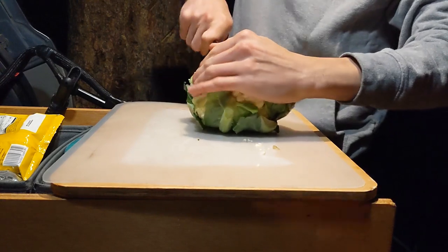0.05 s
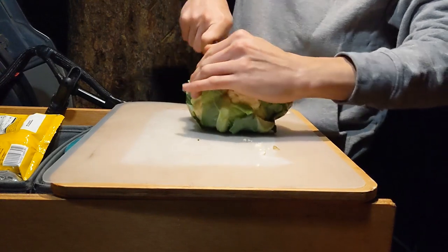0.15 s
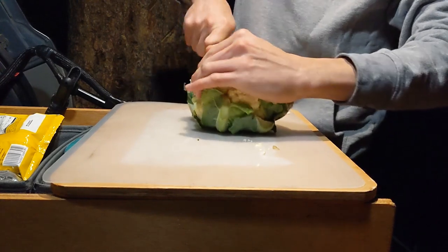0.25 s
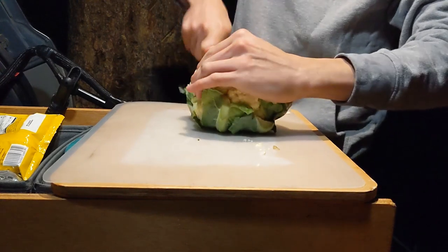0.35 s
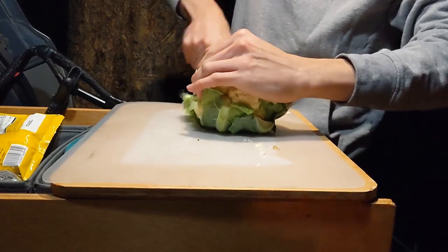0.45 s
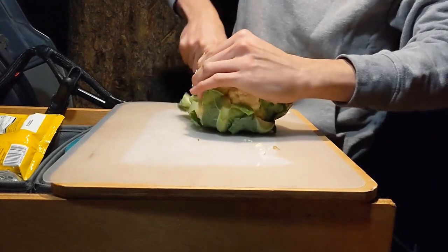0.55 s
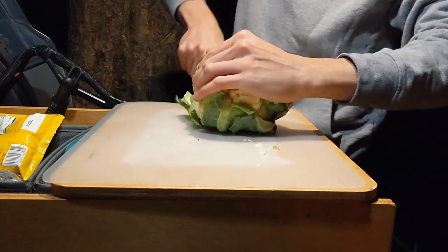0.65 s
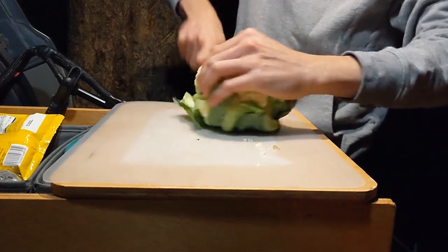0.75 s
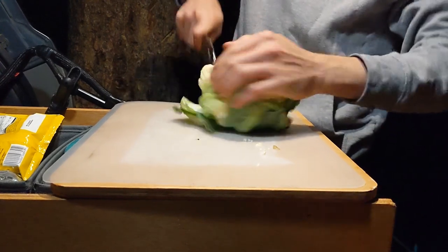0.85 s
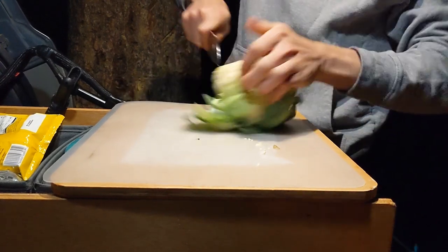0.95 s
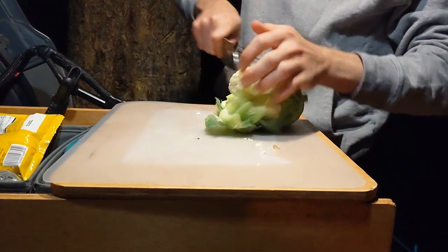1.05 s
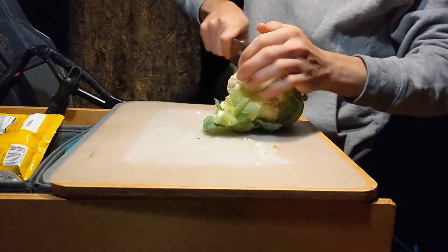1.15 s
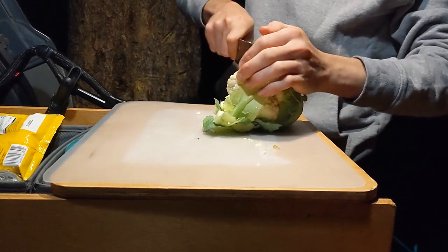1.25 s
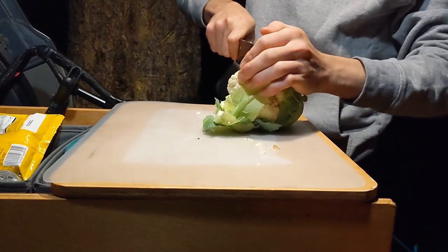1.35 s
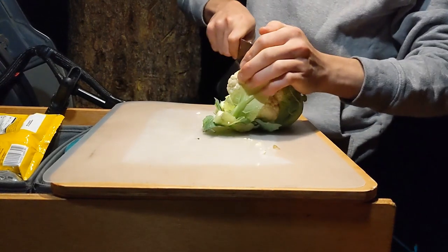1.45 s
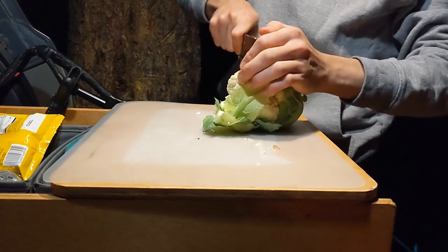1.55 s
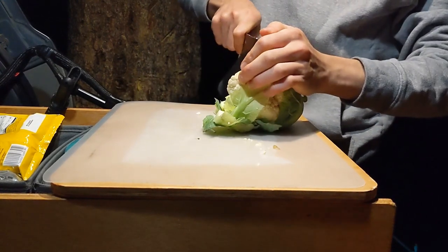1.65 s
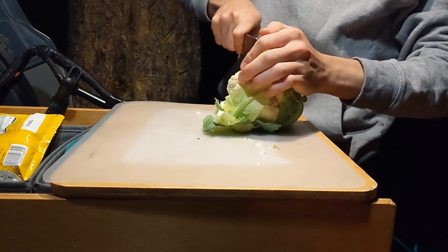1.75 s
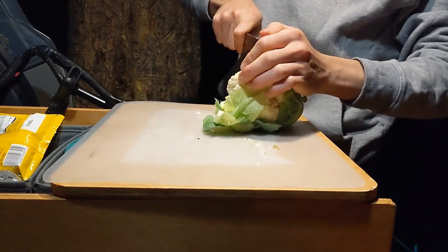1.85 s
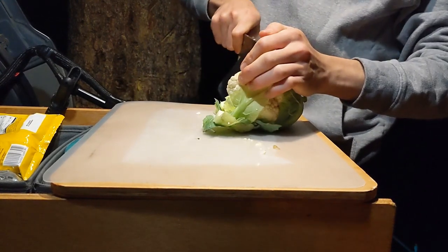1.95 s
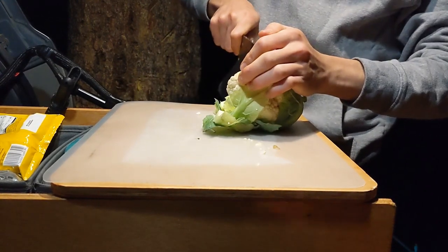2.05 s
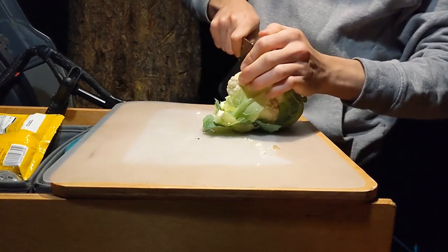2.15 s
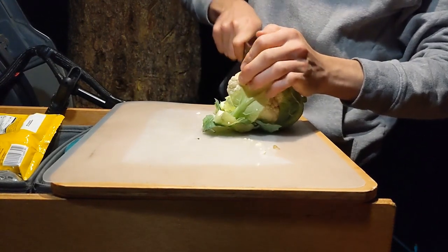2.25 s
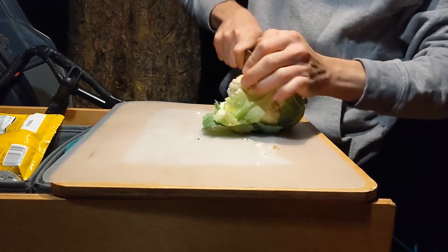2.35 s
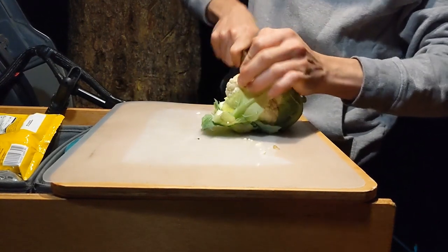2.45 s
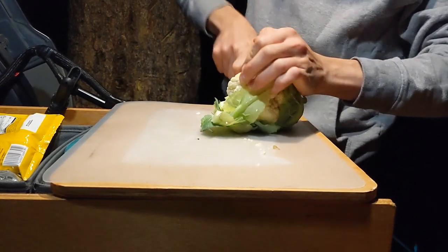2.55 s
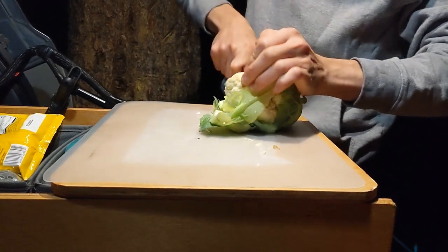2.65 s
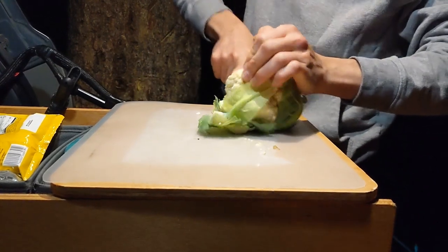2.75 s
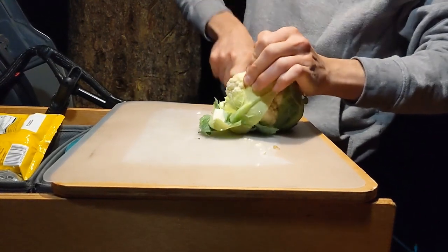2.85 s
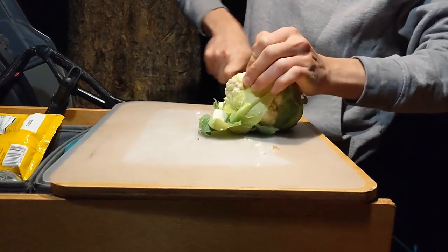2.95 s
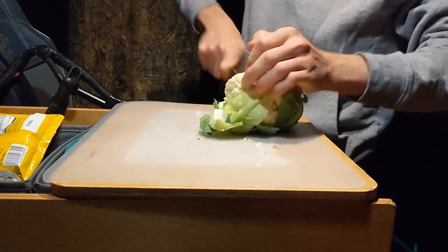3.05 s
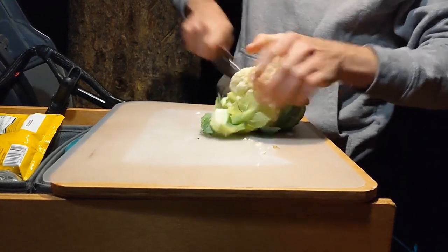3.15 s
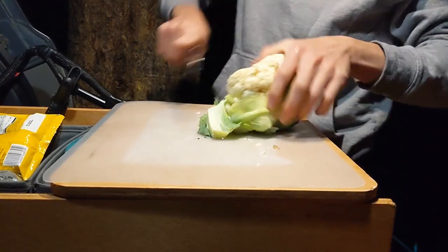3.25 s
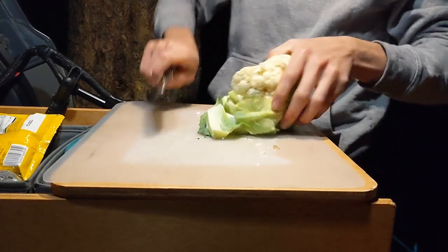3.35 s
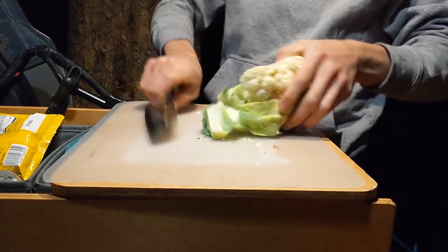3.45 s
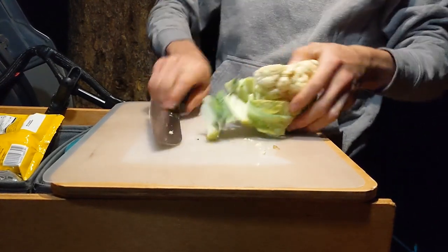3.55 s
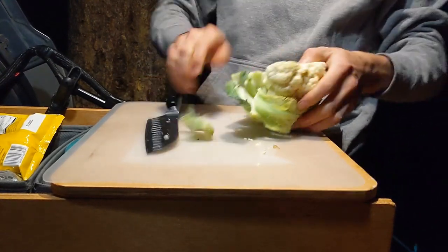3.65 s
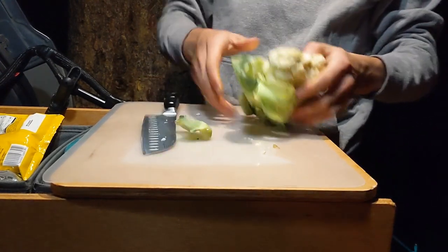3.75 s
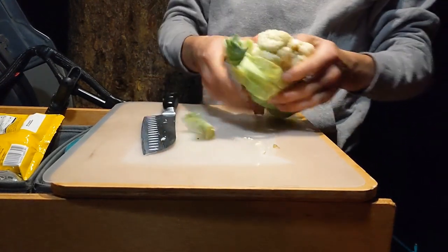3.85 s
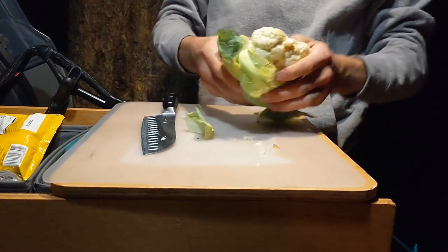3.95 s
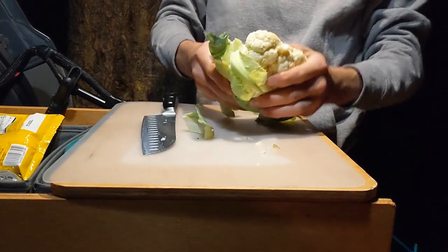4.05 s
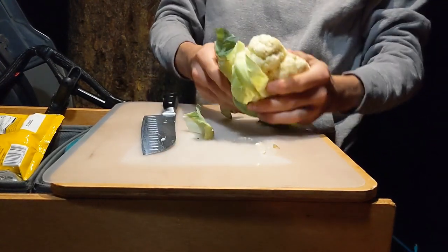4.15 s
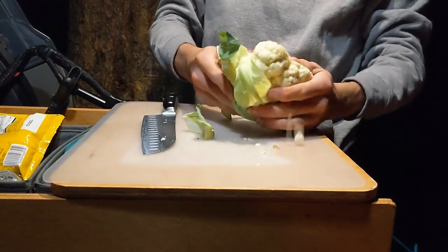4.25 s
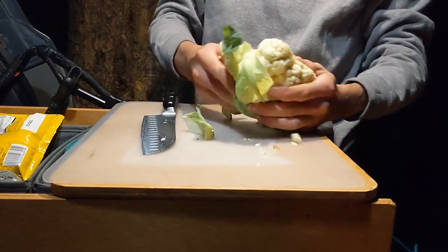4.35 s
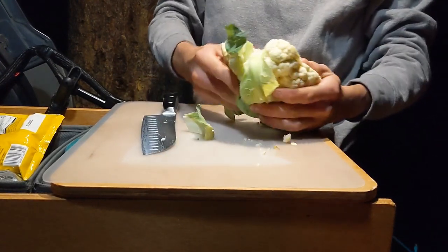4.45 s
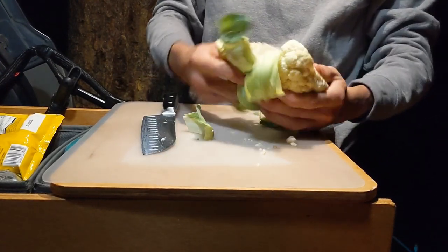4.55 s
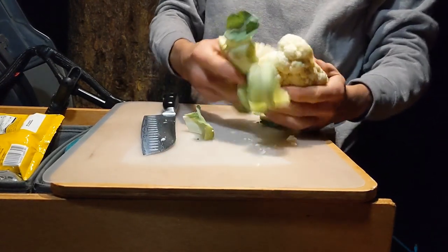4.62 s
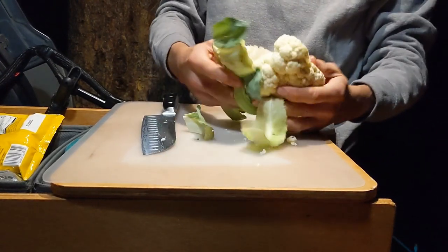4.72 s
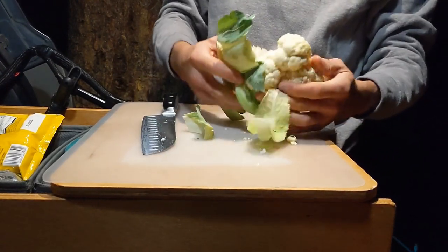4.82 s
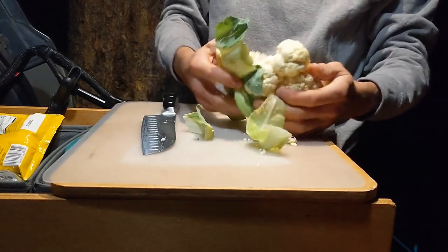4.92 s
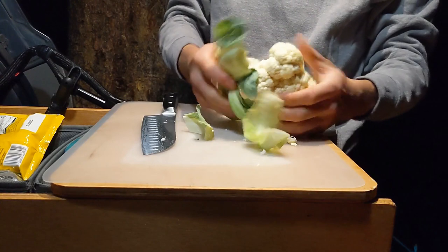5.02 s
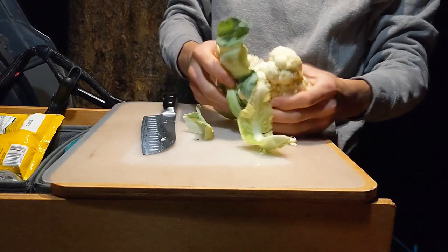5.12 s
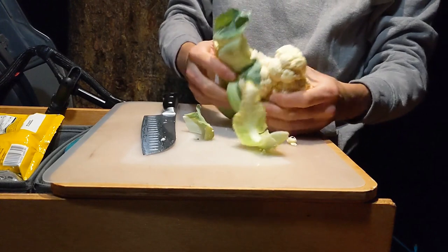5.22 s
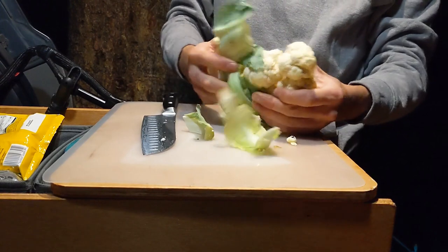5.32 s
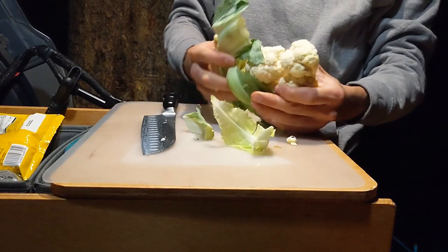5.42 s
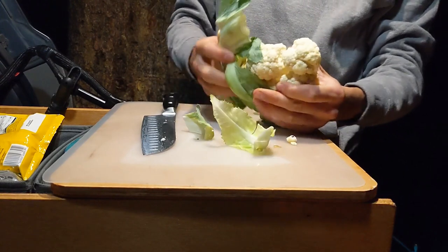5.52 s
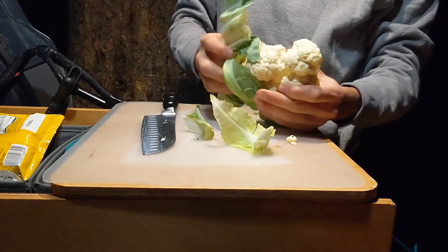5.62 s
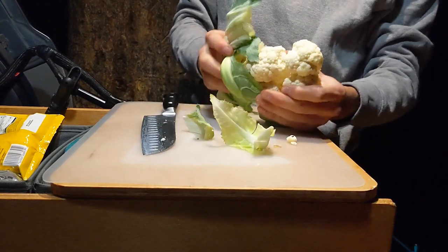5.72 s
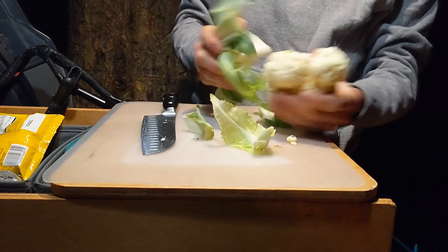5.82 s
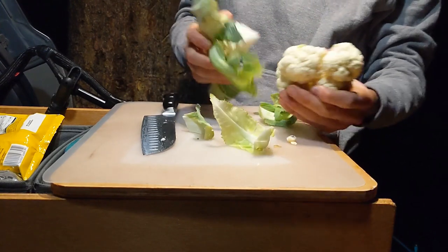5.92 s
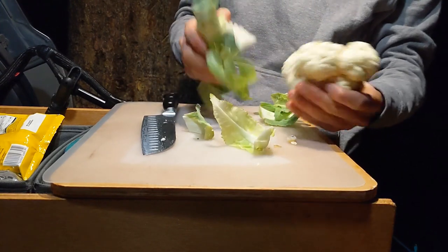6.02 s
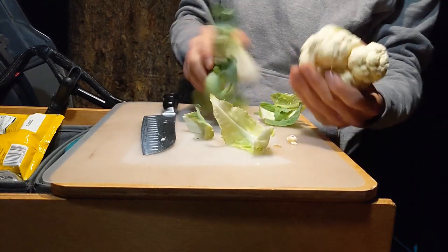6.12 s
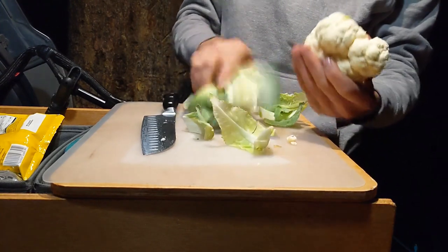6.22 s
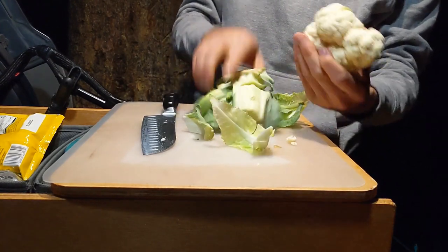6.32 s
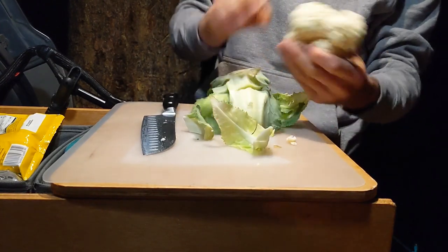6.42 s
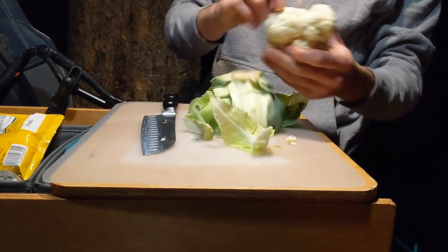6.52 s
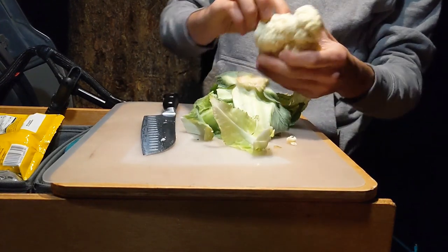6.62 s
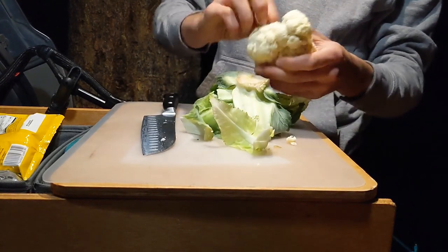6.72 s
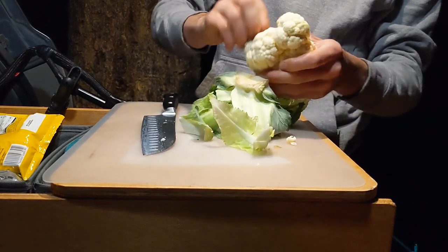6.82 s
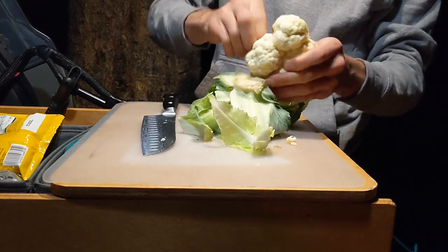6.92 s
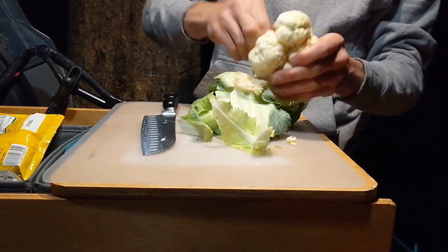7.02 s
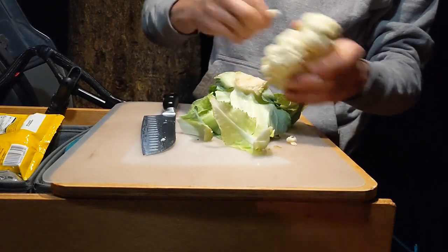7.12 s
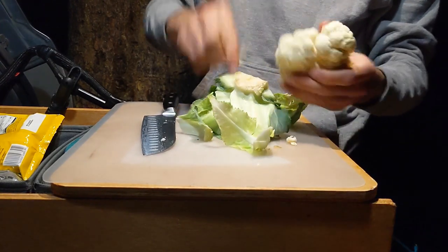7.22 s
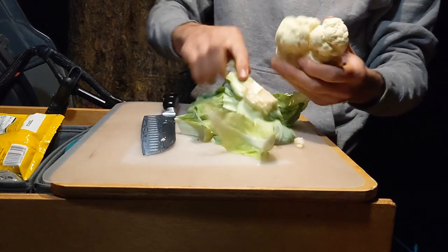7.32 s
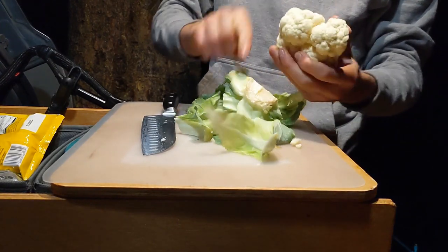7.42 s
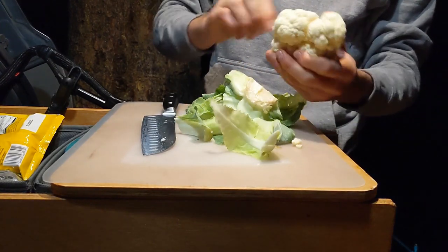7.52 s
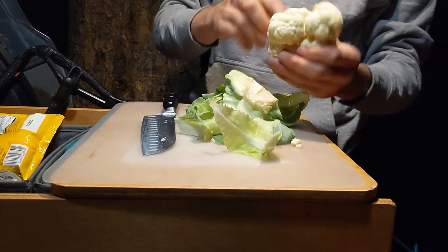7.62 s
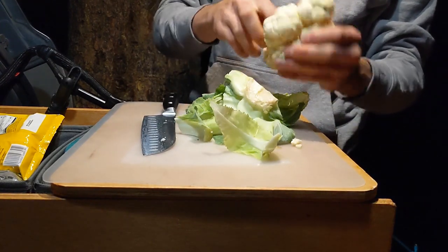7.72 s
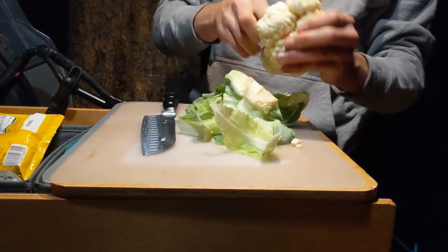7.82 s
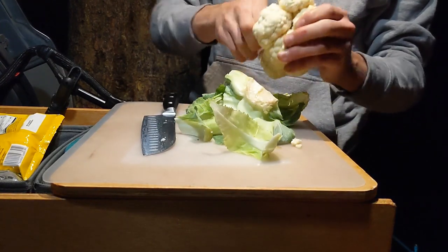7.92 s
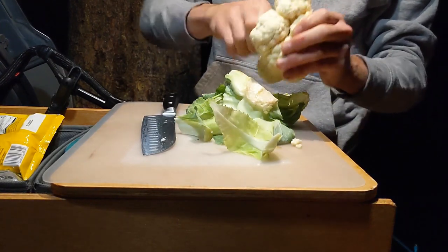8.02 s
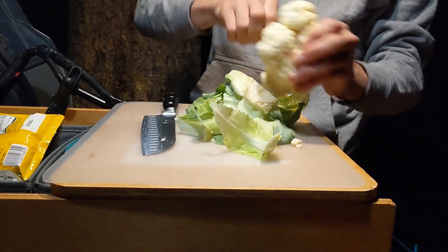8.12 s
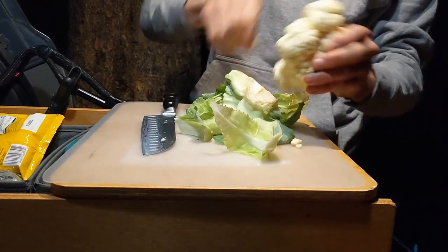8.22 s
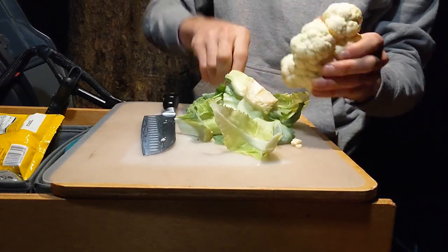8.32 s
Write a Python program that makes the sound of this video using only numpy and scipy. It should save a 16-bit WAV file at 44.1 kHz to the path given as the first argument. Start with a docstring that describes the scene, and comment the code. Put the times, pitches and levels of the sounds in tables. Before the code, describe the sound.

Very close in a small quiet room, a knife crunches through a crisp vegetable stalk and bangs onto a plastic board on a wooden table. After faint rustling, a second cut crunches and knocks. The blade is laid down with a quick clatter, then hands crackle and tear leaves, drop them softly, and snap stems, one especially loud and bright.

```python
"""A small quiet room: on a wooden table, close to the microphones, a cauliflower is trimmed on a plastic board.
A knife crunches through the stalk twice and knocks on the board, then is laid down with a clatter.
Hands tear off the leaves and drop them, and snap the last stems one by one.
Plant sounds are bursts of random clicks; wood, board and steel are decaying modes; the room is shaped noise."""
import sys
import numpy as np
from scipy import signal
from scipy.fft import rfft, irfft
from scipy.io import wavfile
from scipy.ndimage import uniform_filter1d

SR = 44100
rng = np.random.default_rng(int(sys.argv[2]) if len(sys.argv) > 2 else 0)


def digitize_waveform(pressure):
    """Quantize a signal to 16-bit integers and store it at the path in sys.argv[1].

    Rows of a 2-D input are taken as channels; values are limited to [-1, 1].
    """
    field = np.atleast_2d(pressure).T
    bounded = np.clip(field, -1, 1)
    quanta = np.round(bounded * 32767).astype(np.int16)
    wavfile.write(sys.argv[1], SR, quanta)


N = 369110


def gain_of(db):
    """Decibels to amplitude."""
    return 10 ** (np.asarray(db) / 20)


def clock(seconds):
    """Sample times from zero."""
    return np.arange(int(seconds * SR)) / SR


def at_level(x, db, seconds):
    """Gives x the energy of a sound of that level and length."""
    return x * gain_of(db) * np.sqrt(seconds * SR / (np.sum(x ** 2) + 1e-20))


def level_curve(points):
    """Levels in dB joined by straight lines over the whole scene."""
    return np.interp(np.arange(N) / SR, *np.transpose(points))


def read(points, hz):
    """A spectrum joined by lines on a log-frequency axis."""
    f, value = np.transpose(points)
    return np.interp(np.log(hz + 1), np.log(f + 1), value)


def add(mix, s, sound):
    """Lays a sound into the mix at time s."""
    part = mix[..., max(round(s * SR), 0):][..., :sound.shape[-1]]
    part += sound[..., :part.shape[-1]]


def coloured(x, *spectra, size=2048):
    """Causal (minimum-phase) filter with the summed dB spectra."""
    hz = abs(np.fft.fftfreq(size, 1 / SR))
    log_gain = np.log(gain_of(sum(read(points, hz) for points in spectra)))
    # the Hilbert transform of the log gain supplies the minimum phase
    spectrum = np.exp(np.conj(signal.hilbert(log_gain)))
    taps = np.fft.ifft(spectrum).real
    return signal.fftconvolve(x, taps[:size // 2])


def panned(x, db):
    """Places a sound at constant power, db louder on the left."""
    gains = gain_of([[db / 2], [-db / 2]])
    return x * gains / np.sqrt(np.mean(gains ** 2))


def nearby(x, pan_db, scatter_db, t60, count=4):
    """Direct sound, count samples later on the right, plus quick echoes off board and hands, new each time."""
    t, sides = clock(.05), []
    high_pass = signal.butter(1, 250, "high", fs=SR, output="sos")
    for channel in range(2):
        sparse = rng.standard_normal(len(t)) * (rng.random(len(t)) < .15)
        echoes = sparse * gain_of(-60 * t / t60)
        taps = signal.sosfilt(high_pass, at_level(echoes, scatter_db, 1 / SR))
        taps[channel * count] += 1  # direct sound
        sides.append(signal.oaconvolve(x, taps))
    return panned(np.array(sides), pan_db)


def ring(modes, pitch=1, hold=1, in_step=False):
    """Decaying modes after one tap: all in step at the struck spot, alternating further away."""
    t, out = clock(.28), 0
    for k, (hz, db, t60) in enumerate(modes):
        sign = 1 if in_step else (-1) ** k
        decay = gain_of(db - 60 * t / (t60 * hold))
        out = out + sign * decay * np.sin(2 * np.pi * hz * pitch * t)
    return out


def cells(length, per_s, spread_db):
    """Plant cells bursting: random clicks of rms 1, their sizes spread by spread_db."""
    chance, size, sign = rng.random((3, length))
    size_db = spread_db * np.minimum(-np.log(1 - size), 4)
    clicks = (chance < per_s / SR) * gain_of(size_db) * np.sign(sign - .5)
    return clicks / np.sqrt(np.mean(clicks ** 2) + 1e-12)


# crisp colour shared by stems and leaves: pitch_hz, level_db
CRISP_COLOUR = [(60, -26), (300, -4.5), (700, -2.5), (1200, 3.5), (2200, 4), (3200, 0), (5000, 2),
                (7300, 3.5), (9500, -3), (13000, 3), (16000, -2.5)]


def flesh(x, body_db, top_db):
    """The crisp colour of a stem: thick ones sound hollow, thin ones bright."""
    return coloured(x, CRISP_COLOUR, [(2000, body_db), (4500, 0.005), (7500, 0.009), (15000, top_db)])


def speckled(x, depth_db):
    """Each clump of cells has its own colour, a few kHz wide and some milliseconds long."""
    z = signal.stft(x, nperseg=128, noverlap=96)[2]
    patches = rng.standard_normal(z.shape[-2:])
    patches = uniform_filter1d(patches, size=6, axis=0)  # across frequency
    patches = uniform_filter1d(patches, size=14, axis=1)  # across time
    z = z * gain_of(depth_db * patches / patches.std())
    return signal.istft(z, nperseg=128, noverlap=96)[1][..., :N]


def crack(db, body_db, top_db, run_db, pan_db):
    """One sharp crack, then a short run of microcracks."""
    t = clock(0.045)
    run = cells(len(t), per_s=7000, spread_db=-1.0) * np.exp(-(t / 0.0086) ** 2) * (t > .001)
    first = at_level(signal.unit_impulse(len(t)), db, 0.0017)
    clicks = first + at_level(run, db + run_db, 0.00084)
    return nearby(flesh(clicks, body_db, top_db), pan_db, scatter_db=1.0, t60=0.041)


def effort(length, peak_share):
    """The force of one stroke: it builds until the plant gives, then falls."""
    peak = np.clip(peak_share, .05, .95)
    return np.interp(clock(length) / length, [0, peak, 1], [.15, 1, .1])


def crunching(force, db, body_db, top_db, count=2):
    """Cells burst in clumps, as count independent layers from one place; db is set before force and colour."""
    t, length = np.arange(len(force)) / SR, len(force) / SR
    knots = np.arange(0, length + .01, .005)
    clumps = gain_of(1.8 * np.interp(t, knots, rng.standard_normal(len(knots))))
    out = 0
    for layer in range(count):
        grains = at_level(cells(len(t), per_s=3500, spread_db=4.5) * clumps, db, length / count)
        out = out + nearby(flesh(grains * force, body_db, top_db), pan_db=6.5, scatter_db=1.0, t60=0.043)
    return out


# left-right likeness of the room's sound, 1 = identical: pitch_hz, likeness
LIKENESS = [(60, 0.84), (130, .9), (290, 0.56), (640, 0.29), (1400, 0), (16000, 0)]


def diffuse(length):
    """Stereo noise of a room: alike in the bass, unrelated in the treble."""
    a, b = rfft(rng.standard_normal((2, length)))
    same = np.clip(read(LIKENESS, np.fft.rfftfreq(length, 1 / SR)), -1, 1)
    right = same * a + np.sqrt(1 - same ** 2) * b
    return irfft(np.array([a, right]), length)


# colour of the room's low rumble: pitch_hz, level_db
AIR_COLOUR = [(15, -50), (25, -13.5), (48, 0.5), (120, -1.5), (170, -3.5), (195, -14), (285, -10.5),
              (326, -13.5), (439, -15.5), (988, -15.5), (1130, -16), (2220, -23), (5280, -29.5),
              (6740, -29), (16000, -40.5)]
AIR_DB = -64
# swells of a faint hollow hiss, perhaps a sleeve: start_s, level_db
HISS_LEVEL = [(0, -67), (.9, -73), (1.149, -68), (1.4, -84), (2.0, -78), (8.37, -83)]
# colour of that hiss: pitch_hz, level_db
HISS_COLOUR_DB = [(100, -20.5), (600, -6.5), (1500, -6), (2300, -1.5), (3200, -13.5), (9000, -29.5)]


def background():
    """Low rumble of the room and a faint hollow hiss, perhaps a sleeve, that swells and fades: coloured noise."""
    air = np.array([coloured(side, AIR_COLOUR, size=8192)[:N] for side in diffuse(N)])
    hiss = np.array([coloured(side, HISS_COLOUR_DB)[:N] for side in diffuse(N)])
    air = at_level(air, AIR_DB, 2 * N / SR)
    hiss = at_level(hiss, level_curve(HISS_LEVEL), 2 * N / SR)
    return panned(air + hiss, 1.1)


# time for the room to die by 60 dB: pitch_hz, t60_s
ROOM_DECAY = [(100, 0.36), (400, .24), (2000, 0.28), (7000, 0.27), (15000, 0.14)]


def room(x, count=3):
    """Diffuse tails, each band dying at its own speed; the sound turns among them at 23 Hz."""
    out, turn = np.zeros((2, N)), 2 * np.pi * 23 * np.arange(N) / SR
    for k in range(count):
        hz, t, z = signal.stft(diffuse(16384), SR, nperseg=256)
        decay = gain_of(-60 * t / read(ROOM_DECAY, hz)[:, None])
        tail = signal.istft(z * decay, SR, nperseg=256)[1]
        tail *= np.clip(np.arange(tail.shape[1]) / SR / 0.013, 0, 1)  # builds up over 13 ms
        share = np.cos(turn + np.pi * k / count) * np.sqrt(2 / count)
        sent = (x.mean(0) * share)[None]
        out += signal.fftconvolve(sent, at_level(tail, 0, 2 / SR), axes=1)[:, :N]
    return out


# fingers working over the leaves, before colour: start_s, level_db
HANDLING_LEVEL = [(0, -83), (1.1, -74), (2.0, -87.5), (4.0, -69.5), (4.8, -76), (5.8, -74.5), (6.5, -82.5),
                  (8.37, -80.5)]


def handling():
    """Faint crackle of leaves in the hands: bursting cells, partly shared by both sides, swelling and sinking."""
    level = gain_of(level_curve(HANDLING_LEVEL))
    shared, sides = cells(N, per_s=1200, spread_db=5.0), []
    for side in range(2):
        crackle = (shared + cells(N, per_s=1200, spread_db=4.0)) * level
        sides.append(flesh(crackle, body_db=2.0, top_db=-3.5)[:N])
    return panned(speckled(np.array(sides), depth_db=3.5), 4.6)


# modes of the wooden table, unloaded: pitch_hz, level_db, t60_s
TABLE_MODES = [(58.3, -19, 0.27), (88, 0, 0.11), (126.6, 5.5, 0.19), (172.6, 0.5, 0.14)]
# modes of the plastic board, unloaded: pitch_hz, level_db, t60_s
BOARD_MODES = [(265.8, -3.5, 0.16), (316.2, 1.5, 0.16), (360, 0, 0.15), (466, -8.5, 0.11), (515, -7.5, .09),
               (572, -8.5, .11), (647.3, -4, 0.141), (725, -5, 0.034), (1213, -6, 0.052),
               (1307, -16, 0.074), (1553, -11.5, .06), (1846, -14.5, .04), (2045, -10.5, 0.068)]
# colour of the dense clack: pitch_hz, level_db
CLACK_COLOUR = [(60, -28), (200, 9), (350, 10), (850, -1.5), (1400, 2), (2200, -4.5), (3200, -12),
                (5000, -23.5), (12000, -44)]
# blows on the board: start_s, thump_db, knock_db, hardness_db_per_octave
BOARD_BLOWS = [(0.08, -39.5, -39.5, -7.5), (0.17, -49, -57.5, -7), (0.288, -43.5, -52.5, -2),
               (0.375, -50.5, -57.5, -6), (0.648, -21, -20.5, -3), (0.662, -29, -31.5, 0),
               (1.151, -53.5, -60.5, -7), (2.849, -28.5, -24.5, -4.5), (3.362, -50.5, -54.5, 0),
               (3.578, -53, -38, 4), (3.69, -41, -39.5, 9), (3.7093, -32, -27.5, 1),
               (3.744, -38, -38, -1.5), (3.778, -35.5, -28.5, 1.5), (3.956, -60, -45.5, 3),
               (4.0, -58, -49, 0), (4.3281, -37.5, -44.5, 2.5), (4.361, -44, -44.5, 4),
               (4.756, -48, -63, -2), (4.838, -54, -55.5, 1), (4.985, -57.5, -55.5, 0.5),
               (5.902, -38.5, -43, -1.5), (6.345, -38.5, -45, 1), (7.359, -40, -44, 4),
               (7.63, -60.5, -51.5, 0.5)]
# the thump is higher until the hands lift the head off the board (factors on pitch)
LIFT_S, PRESSED_PITCH, FREE_PITCH = 3.85, 0.98, 0.809
THUMP_HOLD, KNOCK_HOLD = 0.9, 0.83  # factors on the ring times: the load damps the wood
HOLD_PER_HARDNESS = -0.31  # dB of ring time per dB/octave: dull blows ring on longer than sharp ones


def blows():
    """Each blow gives a low thump of the table and a knock of the board, with a dense, short clack."""
    thumps, knocks = np.zeros(N), np.zeros((2, N))
    t = np.arange(len(ring(TABLE_MODES))) / SR
    for s, thump_db, knock_db, hardness_db in BOARD_BLOWS:
        pitch = PRESSED_PITCH if s < LIFT_S else FREE_PITCH
        thump = ring(TABLE_MODES, pitch, THUMP_HOLD) * (1 - np.exp(-t / 0.0032))  # soft start
        add(thumps, s, at_level(thump, thump_db, 0.025))

        hold = KNOCK_HOLD * gain_of(HOLD_PER_HARDNESS * hardness_db)
        rattle = rng.standard_normal(len(t)) * gain_of(-60 * t / (0.081 * hold))
        clack = at_level(rattle, 0, 1 / SR) + 0.14 * signal.unit_impulse(len(t))
        clack = coloured(clack, CLACK_COLOUR)[:len(t)]
        modes = ring(BOARD_MODES, 0.97, hold, in_step=True)
        knock = at_level(modes, -2.6, 0.93) + at_level(clack, 0, 0.81)
        # the slope spans three octaves, 400 to 3200 Hz
        knock = coloured(knock, [(400, 0.01), (3200, hardness_db * np.log2(8))])
        knock = nearby(knock, pan_db=2.5, scatter_db=1.0, t60=0.046)
        add(knocks, s, at_level(knock, knock_db, 0.054))
    return panned(thumps, 2.8), knocks


# modes of the steel blade: pitch_hz, level_db, t60_s
BLADE_MODES = [(1076, 3.5, 0.068), (1197, -11, 0.15), (1263, -10.5, 0.11), (1560, -1, 0.077),
               (2050, -9, .14), (3200, -24, 0.25), (3750, -27.5, .07), (5270, -10.5, .05),
               (7375, -20, 0.14)]
# the blade touching down: start_s, ring_db, edge_click_db, click_treble_db
TOUCHDOWNS = [(3.578, -36, -26, -4), (3.658, -63, -55, -18), (3.689, -38, -31.5, -15),
              (3.707, -45, -43, -16)]
TICK_RUN_DB, TICK_PAN_DB = -3.5, 14  # the steel edge scrapes on briefly after its click, far to the left


def blade():
    """The steel clicks and rings briefly each time it touches the board."""
    out = np.zeros((2, N))
    for s, ring_db, tick_db, top_db in TOUCHDOWNS:
        steel = nearby(ring(BLADE_MODES), pan_db=7.0, scatter_db=13, t60=0.11)
        add(out, s, at_level(steel, ring_db, 0.04))
        add(out, s, crack(tick_db, body_db=-1.5, top_db=top_db, run_db=TICK_RUN_DB, pan_db=TICK_PAN_DB))
    return out


# short resonances of stalk, ribs and leaves: low pops, high squeaks, the ringing of the loudest snap:
# start_s, pitch_hz, level_db
PLANT_POPS = [(0.162, 636, -57), (0.251, 4080, -46), (0.25, 1380, -52), (0.37, 680, -57),
              (0.6485, 574, -26), (0.662, 2060, -43.5), (0.858, 2930, -48), (2.85, 514, -28.5),
              (4.113, 6400, -48), (4.252, 1286, -49.5), (4.252, 6840, -44.5), (4.291, 6700, -48),
              (4.327, 1190, -34.5), (4.363, 1440, -41), (4.366, 6660, -46), (4.488, 6750, -40.5),
              (4.566, 1340, -40.5), (4.837, 1200, -49), (4.984, 1144, -48.5), (5.226, 7200, -46),
              (5.257, 6950, -47), (7.23, 8790, -24.5), (7.233, 6700, -28), (8.153, 1750, -66)]
POP_S, POP_S_PER_OCTAVE = 0.0066, 0.0015  # length of a pop at 1 kHz; the higher squeaks last longer


def pops():
    """A brief slip, tear or break rings one well-damped resonance of the plant."""
    out, t = np.zeros((2, N)), clock(.08)
    for s, hz, db in PLANT_POPS:
        length = max(POP_S + POP_S_PER_OCTAVE * np.log2(hz / 10 ** 3), .002)
        slips = cells(len(t), per_s=6700, spread_db=1.5) * np.exp(-(t / length) ** 2)
        decay, onset = np.exp(-np.pi * hz * t / 4.5), 1 - np.exp(-hz * t / 2.3)
        resonance = np.sin(2 * np.pi * hz * t) * decay * onset
        pop = signal.fftconvolve(slips, resonance)[:len(t)]
        sound = nearby(pop, pan_db=5.0, scatter_db=-4.5, t60=0.052)
        add(out, s, at_level(sound, db, 2 * length))
    return out


# leaves torn or rubbed by the hands: start_s, length_s, force_db, hollow_body_db, top_treble_db
LEAF_TEARS = [(0.815, 0.088, -55, 3, -9), (0.893, 0.2, -60.5, 2, -11), (1.011, 0.23, -59, 0, -10),
              (1.575, 0.13, -65, -12, -1), (3.116, 0.062, -59, -4.5, -7), (3.358, 0.07, -61.5, 3.5, -8.5),
              (3.639, 0.041, -49.5, 7, -17), (3.741, 0.045, -48, 10, -12), (3.939, 0.06, -48, -1.5, -20),
              (4.133, 0.045, -56.5, -3.5, 6), (4.246, 0.068, -61.5, 3, 4), (4.357, 0.038, -55, 16.5, -8),
              (4.485, 0.041, -43, 0.5, -12), (4.552, 0.085, -35, -2, -13), (4.609, 0.18, -55, -3, -13),
              (4.829, 0.065, -46, -10, -4), (5.041, 0.12, -54.5, -7.5, -8.5), (5.222, 0.03, -54, -26, -12),
              (5.256, 0.05, -56.5, -1, -9.5), (5.349, 0.125, -54.5, -3, -6.5), (5.686, 0.07, -57.5, 2, -4),
              (5.889, 0.056, -41, 0, -0.5), (5.995, 0.046, -60.5, -1, -5.5), (6.326, 0.066, -48.5, 4.5, -6),
              (6.661, 0.098, -65, 7.5, -15), (6.9, 0.1, -66, 1.5, 2), (7.236, 0.09, -46, -14, -5),
              (7.342, 0.076, -47.5, 0.5, -10), (7.621, 0.041, -64.5, 13.5, -18),
              (7.913, 0.022, -57, -21, -5), (8.021, 0.039, -61.5, 7, -18), (8.081, 0.05, -51.5, -2, -7.5),
              (8.137, 0.037, -54, 4.5, 0.5)]
TEAR_PEAK_SHARE = 0.35  # a leaf gives early and trails off


def tears():
    """Leaf cells burst in a crunch that follows the force of the hands."""
    out = np.zeros((2, N))
    for start, length, db, body_db, top_db in LEAF_TEARS:
        add(out, start, crunching(effort(length, TEAR_PEAK_SHARE), db, body_db, top_db))
    return out


# pushes of the knife through the stalk: start_s, length_s, force_db, hollow_body_db
KNIFE_PUSHES = [(0.055, 0.072, -53, 1.5), (0.263, 0.071, -60.5, -12), (0.39, 0.11, -52.5, -6),
                (0.463, 0.12, -38, -9), (0.548, 0.07, -49, -3.5), (0.625, 0.036, -43.5, 0),
                (2.316, 0.15, -64, 1), (2.494, 0.1, -58, 0.5), (2.591, 0.125, -48, 1.5),
                (2.748, 0.065, -50.5, 2), (2.811, 0.05, -43, 1), (2.86, 0.064, -48, 5),
                (2.913, 0.11, -58.5, 6), (3.014, 0.045, -51, 1)]
CUT_PEAK_SHARE, CUT_TOP_DB = 0.53, -6.5  # a push builds for about half its length, then the stalk gives
JUDDER_DB = 9  # shaking of the table re the force of the push


def cuts():
    """Knife pushes crunch through the stalk; their jerky force also shakes table and board."""
    crunch, judder = np.zeros((2, N)), np.zeros(N)
    wood = at_level(ring(TABLE_MODES), 0, 1 / SR) + at_level(ring(BOARD_MODES), -11.5, 1 / SR)
    for start, length, db, body_db in KNIFE_PUSHES:
        force = effort(length, CUT_PEAK_SHARE)
        add(crunch, start, crunching(force, db, body_db, CUT_TOP_DB))
        jerks = rng.standard_normal(len(force) + len(wood))
        shake = signal.fftconvolve(jerks, wood, "valid")[:len(force)]
        shake = at_level(shake, db + JUDDER_DB, length) * force
        add(judder, start, shake * signal.windows.tukey(len(force), .3))
    return crunch, panned(judder, 2.6)


# sharp cracks: mostly brittle stems breaking, one a clump of leaves landing on the board;
# levels before colour, microcracks re the crack:
# start_s, crack_db, hollow_body_db, top_treble_db, microcracks_db
SHARP_CRACKS = [(0.205, -49.5, 9.5, -2, -15), (0.252, -40.5, 0, -11, -22), (0.4944, -38.5, 0.5, 3.5, 5.5),
                (0.5272, -30.5, 1, -10, 5), (0.576, -49, -16, -3.5, -7), (0.608, -40, -29, -7, 0),
                (0.6474, -27, 4, -33.5, -13), (0.811, -43.5, -17.5, -8, -26), (1.496, -60, -29, 7, -6),
                (1.758, -55.5, -13, -4, -1), (1.9346, -56.5, -7, -7, -23), (2.7631, -44, 3, -4.5, -3.5),
                (2.8218, -38, 2.5, 2, 4.5), (2.8504, -24, 7.5, -22, -14), (4.113, -41, -5.5, -9, -6),
                (4.3276, -35, 6.5, -15, -9), (4.4926, -38.5, 0.5, -15, 2), (4.508, -37, -15, -17, -10.5),
                (4.5659, -30, -23, -19, -11), (4.5788, -27, -3, 2.5, -12), (5.048, -53, -10, 0, 2),
                (5.1362, -48, -1.5, -5, -9), (5.851, -40, 9.5, -12.5, -8), (5.9, -42.5, 0, -6, 6),
                (6.3387, -38, 7, -8, 0), (6.3785, -44, -19, 1.5, -14), (6.608, -60.5, 12, -26, -2.5),
                (7.0116, -56, -16, -4.5, 2.5), (7.068, -54.5, -11, 13.5, -3),
                (7.0841, -29.5, -11.5, -6.5, -7), (7.135, -51.5, -0.5, -3.5, 2), (7.141, -42, 0.5, 0, -9),
                (7.23, -14.5, -9, -6, -11), (7.363, -43.5, -7, -5, -6), (7.9997, -52.5, -8.5, -13, -4.5),
                (8.0468, -48.5, -4, 1, -1), (8.099, -41.5, -0.5, -3, -10), (8.1432, -35.5, 0, 9, -16)]
SNAP_PAN_DB = 5


def snaps():
    """Sharp cracks, mostly of breaking stems: each is one click and a run of microcracks."""
    out = np.zeros((2, N))
    for s, db, body_db, top_db, run_db in SHARP_CRACKS:
        add(out, s, crack(db, body_db, top_db, run_db, SNAP_PAN_DB))
    return out


def scene():
    """Vegetable, board and knife close to the microphones, in the room."""
    cut_crunch, judder = cuts()
    thumps, knocks = blows()
    crunch = speckled(cut_crunch + tears(), depth_db=2.5)
    crisp = snaps() + crunch + pops() + handling()
    hard = knocks + blade()
    low = thumps + judder
    to_room = gain_of(-15.5) * crisp + gain_of(-23) * hard + gain_of(-17.5) * low
    return crisp + hard + low + room(to_room) + background()


EDGE_HZ = 16300  # upper band limit


def record(dry):
    """The recorder's bass roll-off, soft overload of loud peaks, and band limit."""
    dry = signal.sosfilt(signal.butter(2, 42, "high", fs=SR, output="sos"), dry)
    dry = np.tanh(dry)
    low_pass = signal.firwin(255, EDGE_HZ, window=("kaiser", 9), fs=SR)
    return signal.oaconvolve(dry, low_pass[None], "same")


dry = scene()
out = record(dry)
digitize_waveform(out)
```